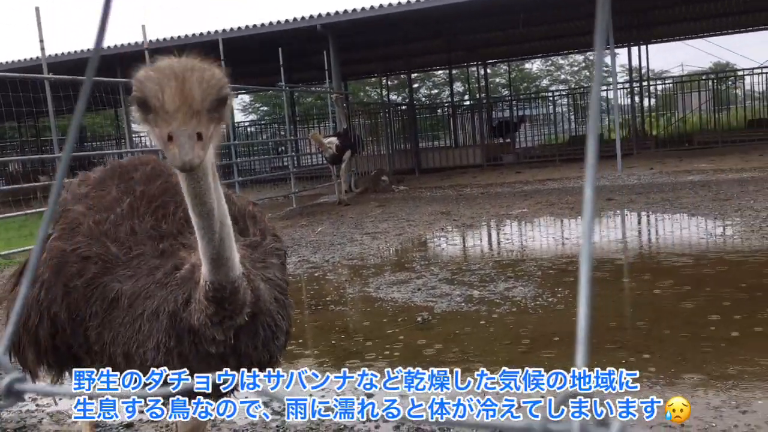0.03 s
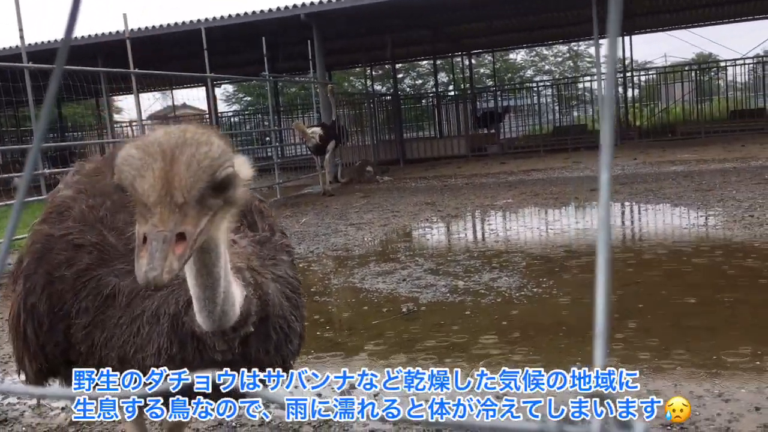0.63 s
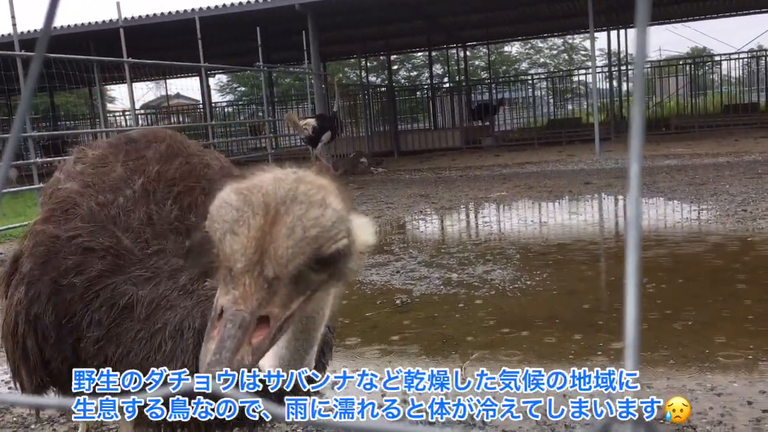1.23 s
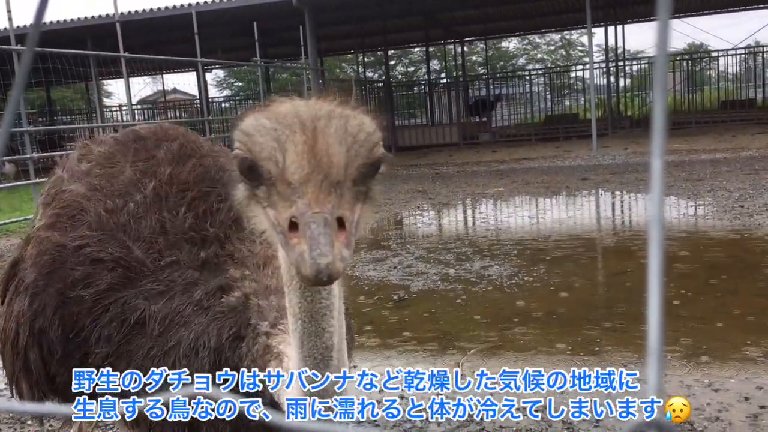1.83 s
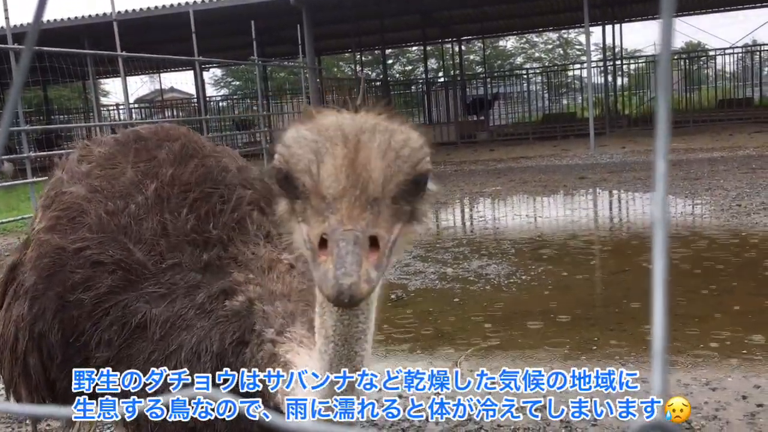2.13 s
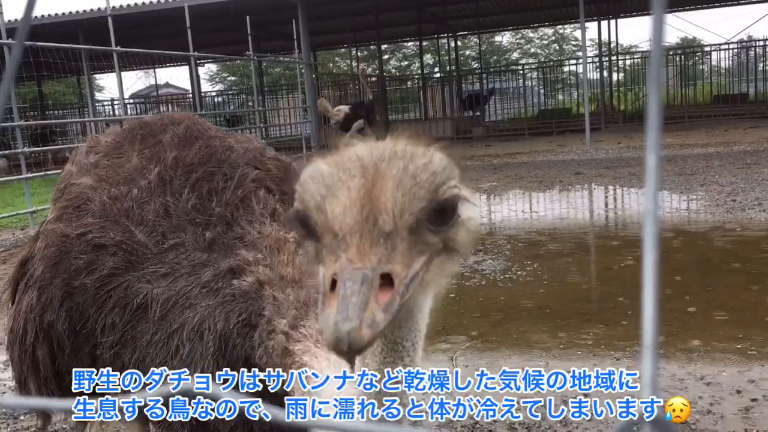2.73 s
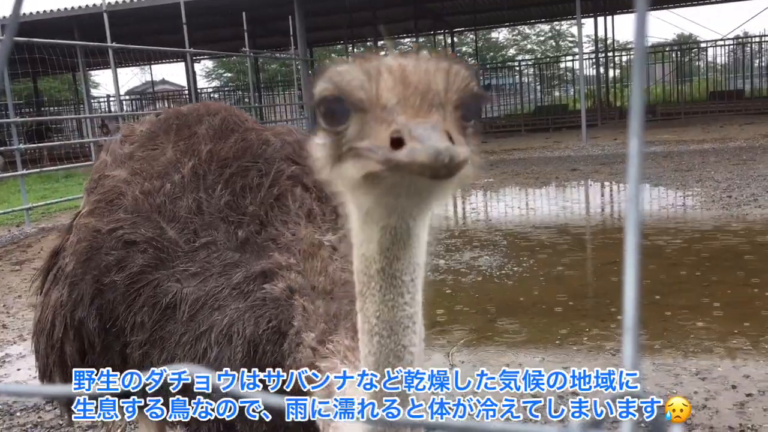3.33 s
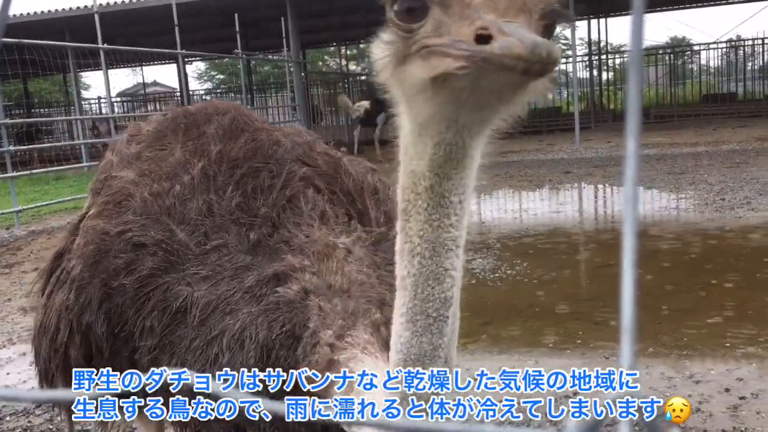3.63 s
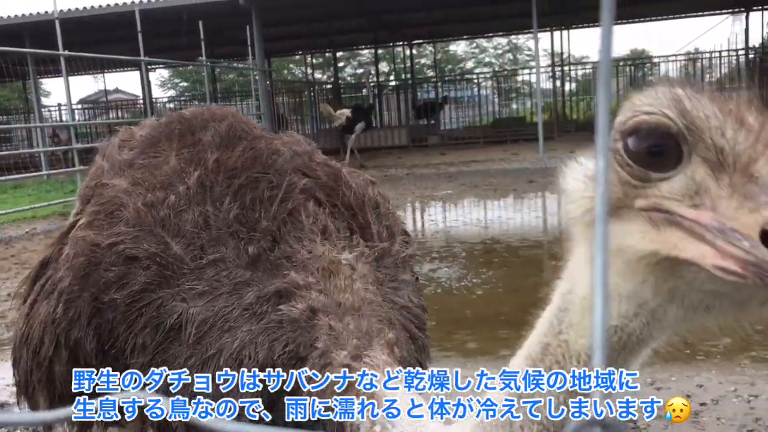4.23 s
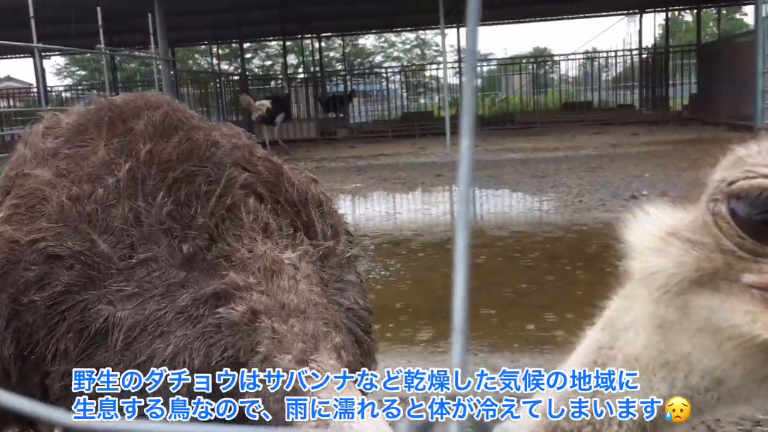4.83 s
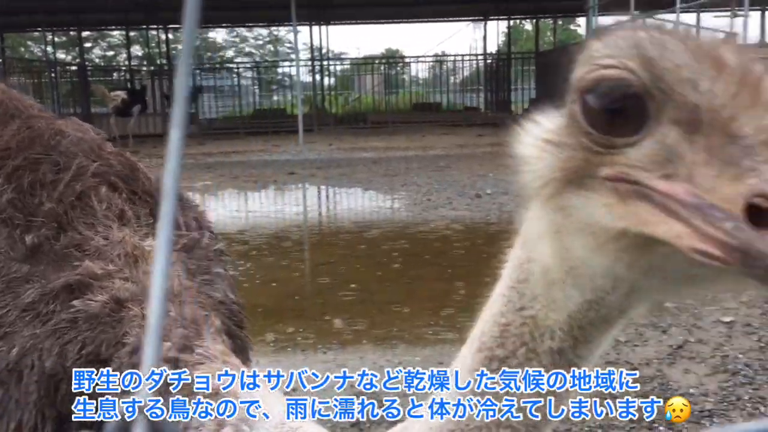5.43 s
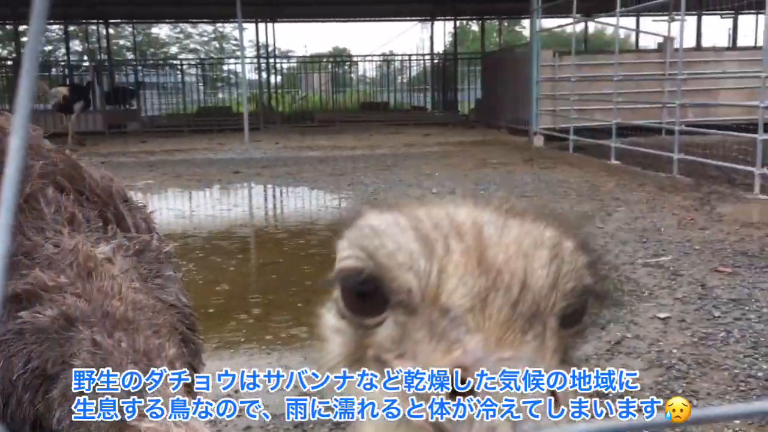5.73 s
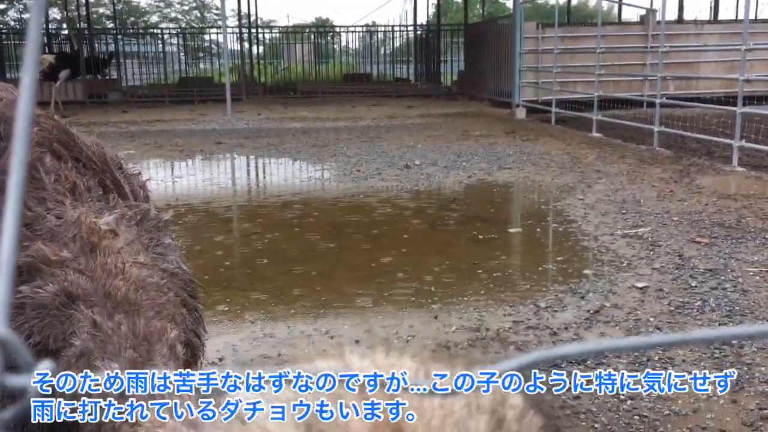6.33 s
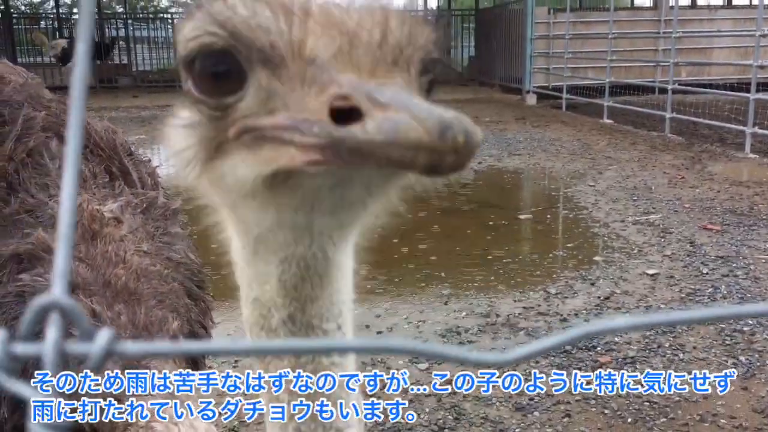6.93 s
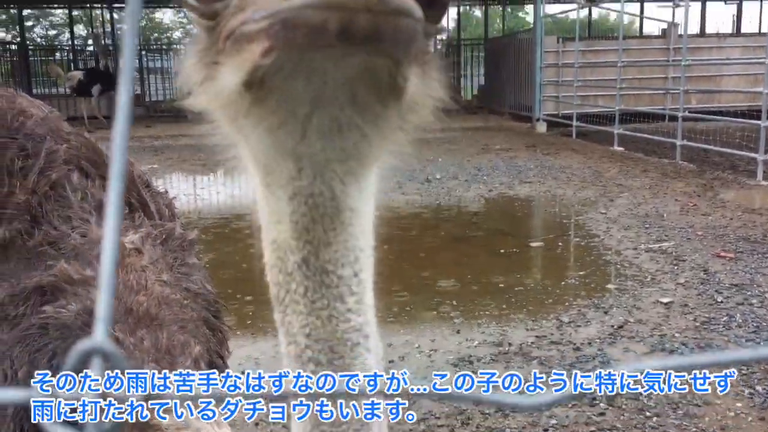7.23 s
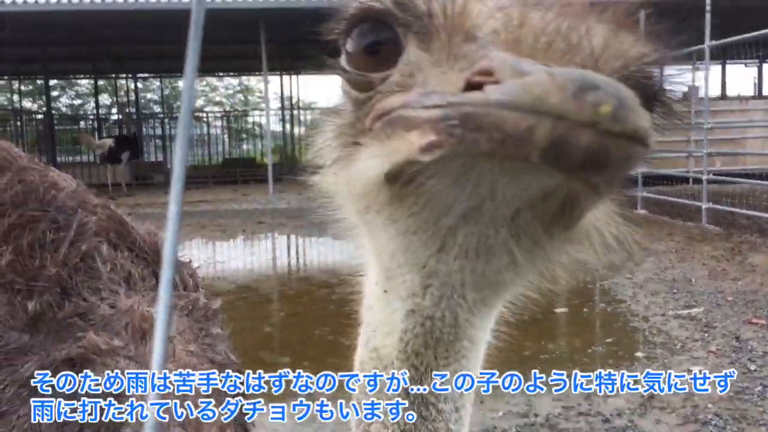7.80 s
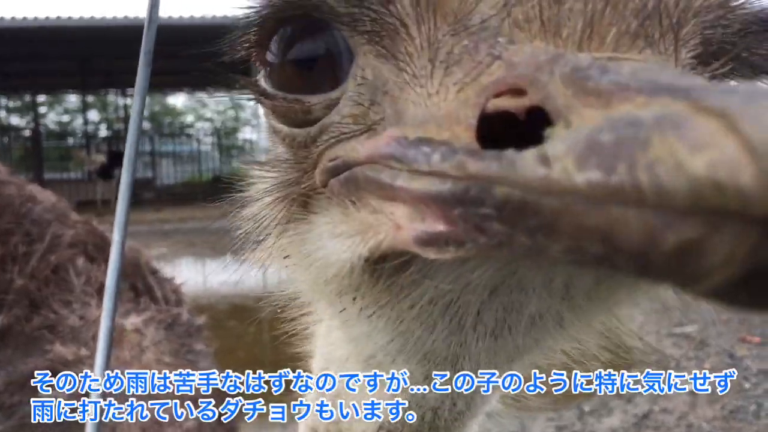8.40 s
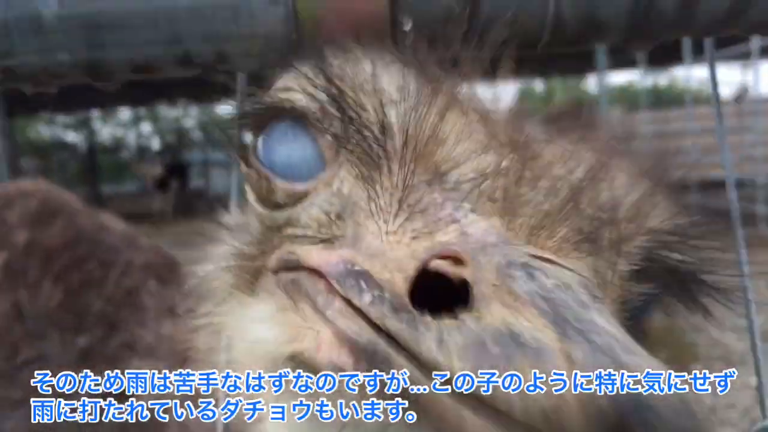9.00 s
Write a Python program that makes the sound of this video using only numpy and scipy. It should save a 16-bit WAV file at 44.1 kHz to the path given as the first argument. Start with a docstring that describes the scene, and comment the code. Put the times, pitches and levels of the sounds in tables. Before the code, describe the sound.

A cricket's high buzz repeats in light rain as a beak clicks and scrapes in grit, ending with a loud, close knock.

```python
"""An ostrich forages at the fence of a wet pen; drizzle and a low outdoor rumble run throughout.
At 0.3 s its beak clicks, knocks dully and scrapes in the gravel, again at 2.5 s and 5.4 s.
From 0.85 s a cricket buzzes its wings about once a second; from 1.3 s small birds call far off.
Near 8.9 s the beak knocks hard on a camera: the casing rings, the mount thumps, a fence wire pings."""
import sys
import numpy as np
from scipy import signal
from scipy.fft import rfft, irfft, next_fast_len
from scipy.io import wavfile

SR = 44100
rng = np.random.default_rng(int(sys.argv[2]) if len(sys.argv) > 2 else 0)


def digitize_waveform(pressure):
    """Quantize a signal to 16-bit integers and store it at the path in sys.argv[1].

    Rows of a 2-D input are taken as channels; values are limited to [-1, 1].
    """
    field = np.atleast_2d(pressure).T
    bounded = np.clip(field, -1, 1)
    quanta = np.round(bounded * 32767).astype(np.int16)
    wavfile.write(sys.argv[1], SR, quanta)


N = 399546

# beak and pebble clicks: start_s, attack_db, low_edge_hz
BEAK_CLICKS = [(.132, -50.5, 2500), (.290, -35, 4500), (.296, -24, 1100), (.3076, -31.5, 700),
               (.3232, -33.5, 400), (.3307, -33.5, 500), (.3352, -29, 700), (.3411, -26.5, 4500),
               (.369, -36, 400), (.459, -43.5, 9100), (.8655, -38, 6000), (.920, -47, 900),
               (2.142, -42, 700), (2.151, -33.5, 1200), (2.349, -47, 4420), (2.4743, -37, 3500),
               (2.477, -33.5, 3000), (2.5194, -28, 3000), (2.602, -35.5, 2200), (2.629, -41, 400),
               (2.6752, -39, 5060), (3.742, -50, 600), (5.3725, -38, 500), (5.4709, -32, 1400),
               (5.4771, -33.5, 1600), (5.5224, -33, 1500), (5.603, -39, 900), (5.7032, -41, 3000),
               (8.893, -41, 2000), (8.946, -44.5, 2500)]
# click spectrum: freq_hz, gain_db
CLICK_SPECTRUM = [(300, -7), (900, -9), (2000, -3), (3200, -0.5), (4400, -1.5), (5000, -3), (6500, 3),
                  (9000, 1.5), (10400, -1), (11400, -2.5), (15500, -6)]
# beak dragged through grit: start_s, length_s, level_db, ring_hz
BEAK_SCRAPES = [(.3, .059, -39.5, 8500), (.351, .045, -38.5, 4400), (2.478, .072, -40.5, 7000),
                (2.506, .029, -32.5, 6800), (5.37, .05, -47, 8000), (5.412, .086, -41.5, 12000)]
# grit spectrum: freq_hz, gain_db
GRIT_SPECTRUM = [(300, -13), (900, -1), (2000, -5), (3000, -1.5), (4400, -0.5), (5000, 1), (6500, 3.5),
                 (9000, 1.5), (10400, -1), (11400, 3.5), (15500, -4.5)]
# dull low knocks of the pecking beak: start_s, relative_peak_db
PECK_KNOCKS = [(0.288, -39), (0.916, -51), (2.141, -40), (2.342, -42), (2.628, -46), (3.286, -43),
               (3.739, -51), (5.371, -39), (5.6, -42), (7.11, -37), (8.064, -41), (8.305, -40)]
# peck knock spectrum: freq_hz, gain_db
PECK_KNOCK_SPECTRUM = [(120, -14), (320, -1.5), (550, -5), (1000, 5), (1600, -1.5), (3500, -7), (5000, -19),
                       (8000, -24)]
# beak blows on the casing: start_s, peak_db, cutoff_hz
CASING_BLOWS = [(8.857, -25, 500), (8.8608, -13, 14000), (8.8617, -15, 4500), (8.869, -12, 7000),
                (8.875, -16, 6000), (8.895, -26, 200), (8.913, -16.5, 600)]
# casing modes: freq_hz, gain_db, t60_s
CASING_MODES = [(215, -11.5, 0.077), (528, -6.5, 0.033), (636, -8.5, .03), (900, -6.5, 0.021),
                (1270, 2, 0.012), (1530, 3, 0.016), (2000, -5, 0.01), (2480, 2, 0.012), (2710, -4, 0.014),
                (3720, -16, 0.018), (5700, -13, 0.014)]
# swings of the mount: start_s, peak_db, first_hz, last_hz, swell_s
MOUNT_THUMPS = [(8.8592, -7.5, 175, 58, 0.0083), (8.858, -21, 230, 178, 0.0083),
                (8.8935, -16, 220, 150, 0.0019), (8.915, -35.5, 120, 54, 0.013)]
# feathers and feet: start_s, length_s, centre_hz, width_hz, level_db
BODY_SWISHES = [(1.85, 0.48, 830, 690, -59.5), (2.22, 0.47, 880, 1240, -53.5), (2.2, 0.41, 240, 210, -55),
                (2.615, 0.036, 2170, 2800, -51), (8.706, 0.064, 13600, 12000, -45.5),
                (8.81, 0.12, 4500, 11000, -51), (8.93, 0.14, 1420, 300, -53.5),
                (8.91, 0.15, 2800, 6000, -55)]
# cricket phrases: start_s, length_s, target_db
CRICKET_PHRASES = [(.85, .42, -42), (1.913, .448, -42.5), (2.951, .478, -42), (3.948, .48, -42.5),
                   (5.068, .447, -43.5), (6.015, .48, -42.5), (6.972, .446, -42), (7.962, .427, -42),
                   (8.985, .4, -42.5)]
# warbler notes (bend < 0 arches, > 0 dips): delay_s, length_s, turn_hz, turn_fraction, bend_hz
WARBLER_NOTES = [(0, .037, 2200, .9, -500), (.21, .06, 1990, .6, 1000), (.433, .029, 2220, .05, -750),
                 (.462, .031, 2010, .5, -1400), (.612, .038, 2280, .4, -2000),
                 (.768, .049, 2260, .47, -2300), (.934, .047, 1960, .25, -650)]
# warbler songs: start_s, level_db
WARBLER_SONGS = [(1.255, -54.7), (3.555, -50.5), (6.04, -58.5)]
# whistled peeps: start_s, length_s, pitch_hz, fall_hz, level_db
SPARROW_PEEPS = [(1.615, .028, 3430, 200, -57), (2.981, .028, 3300, 200, -51),
                 (3.556, .046, 4220, 1050, -54), (5.636, .03, 4100, 270, -53),
                 (5.665, .033, 3380, 100, -52), (6.913, .033, 3820, 400, -56)]
# raspy chirps: start_s, pitch_hz, level_db
SPARROW_CHIRPS = [(2.422, 4050, -59), (3.42, 3550, -62.5), (4.1, 4100, -57), (5.65, 4000, -61),
                  (7.39, 3930, -59.5), (8.405, 6270, -62)]
# open-air rumble spectrum: freq_hz, gain_db
RUMBLE_SPECTRUM = [(15, -36), (25, -12.5), (43, -6.5), (59, 0.5), (92, -8.5), (139, -7), (226, -9.5),
                   (409, -17.5), (466, -21), (963, -19.5), (1460, -21.5), (1780, -18), (2430, -23.5),
                   (4110, -28), (4800, -32.5), (6240, -48), (10600, -120)]
# hiss spectrum: freq_hz, gain_db
HISS_SPECTRUM = [(3500, -16), (5000, -2), (5700, 6), (7700, 1), (8800, 3), (9700, 2.5), (10450, -2),
                 (11500, 3), (13500, 3.5), (15700, -1.5)]


def pecks(pebble_gap_s=.025, pebble_db=-2.5):
    """The beak strikes and drags through gravel, flicking pebbles aside."""
    out = np.zeros(N)
    for start_s, db, edge_hz in BEAK_CLICKS:
        add(out, start_s, click(db, edge_hz))
    for start_s, length_s, db, ring_hz in BEAK_SCRAPES:
        add(out, start_s, scrape(length_s, db, ring_hz))
        for delay_s in rng.uniform(0, length_s, size=int(length_s / pebble_gap_s)):
            add(out, start_s + delay_s, click(db + pebble_db, edge_hz=1500))
    return echo(out, t60_s=.32, wet_db=-18)


def click(db, edge_hz, attack_s=.005, ring_db=-16):
    """A hard crack rings a pebble; smaller grit has a higher low edge and sounds thin."""
    t = span(.067)
    crack = noise(t) * fade(t, t60_s=.0067)
    pebble = sum(band(noise(t), hz, width_hz=860) for hz in rng.uniform(3670, 12860, size=4))
    ring = amp(ring_db) * unit(pebble) * fade(t, t60_s=.032)
    hit = highpass(colour(crack + ring, CLICK_SPECTRUM), edge_hz)
    return hit / hit[t < attack_s].std() * amp(db)


def scrape(length_s, db, ring_hz, ring_db=-3):
    """Tiny grains crunch and ring the stones beneath."""
    t = span(length_s)
    grit = grains(len(t), rate_per_s=16000, spread_db=5.5)
    crunch = unit(colour(grit, GRIT_SPECTRUM))
    stones = amp(ring_db) * unit(band(grit, ring_hz, .8 * ring_hz))
    return unit(crunch + stones) * np.sqrt(arch(t)) * amp(db)


def peck_knocks(gain_db=1.3):
    """Dull low knocks of the pecking beak."""
    out, t = np.zeros(N), span(.1)
    for start_s, db in PECK_KNOCKS:
        burst = noise(t) * fade(t, t60_s=.03)
        add(out, start_s, peak(colour(burst, PECK_KNOCK_SPECTRUM), db + gain_db))
    return out


def casing_blows(crack_db=4.5, detune=.043):
    """The beak rattles on the casing; each blow hits a new spot and moves the modes differently."""
    out, t = np.zeros(N), span(.12)
    for start_s, db, cutoff_hz in CASING_BLOWS:
        ring = np.zeros(len(t))
        for hz, mode_db, t60_s in CASING_MODES:
            gain = rng.choice([-1, 1]) * amp(mode_db)
            ring += gain * np.sin(2 * np.pi * hz * rng.normal(1, detune) * t) * fade(t, t60_s)
        crack = amp(crack_db) * noise(t) * fade(t, t60_s=.0065)
        add(out, start_s, peak(lowpass(ring + crack, cutoff_hz), db))
    return echo(out, t60_s=.25, wet_db=-20)


def mount_thumps(settle_s=.0063):
    """The mount swings, its pitch sinking as the contact relaxes."""
    out, t = np.zeros(N), span(.12)
    for start_s, db, first_hz, last_hz, swell_s in MOUNT_THUMPS:
        hz = last_hz + (first_hz - last_hz) * np.exp(-t / settle_s)
        envelope = (t / swell_s * np.exp(-t / swell_s)) ** .98
        swing = -np.cos(2 * np.pi * np.cumsum(hz) / SR)
        add(out, start_s, peak(swing * envelope, db))
    return out


def wire_ping(pitch_hz=3230, level_db=-49):
    """The last click plucks a fence wire."""
    out, t = np.zeros(N), span(.12)
    ring = np.sin(2 * np.pi * pitch_hz * t) * fade(t, t60_s=.15)
    add(out, BEAK_CLICKS[-1][0], ring * amp(level_db))
    return out


def swishes():
    """Feathers and feet brush past: soft swells of fine grains."""
    out = np.zeros(N)
    for start_s, length_s, hz, width_hz, db in BODY_SWISHES:
        t = span(length_s)
        friction = grains(len(t), rate_per_s=9000, spread_db=3.5)
        add(out, start_s, unit(band(friction, hz, width_hz)) * arch(t) * amp(db))
    return out


def cricket(wing_hz=6875, fall_hz=960, stroke_s=.0047, return_s=.0028, return_db=-10):
    """Each wing stroke is a falling tone with a weaker return; a phrase grows louder and slower."""
    swell_db, swell_s = 12, .19
    strokes_per_s, slowing_per_s2 = 150, 36
    out, t = np.zeros(N), span(stroke_s)
    for start_s, length_s, target_db in CRICKET_PHRASES:
        age_s = 0
        for jitter, force, detune, slack in rng.standard_normal((80, 4)):
            if age_s > length_s:
                break
            db = target_db - swell_db * np.exp(-age_s / swell_s) + 1.1 * force
            hz = wing_hz + 25 * detune + fall_hz * (.5 - t / stroke_s)
            stroke = tone(hz) * arch(t) ** 2 * amp(db)
            onset_s = start_s + age_s - stroke_s / 2
            add(out, onset_s, stroke)
            add(out, onset_s + return_s * (1 + .04 * slack), stroke * amp(return_db))
            age_s += (1 + .0018 * jitter) / (strokes_per_s - slowing_per_s2 * age_s)
    return echo(out, t60_s=.072, wet_db=-14)


def warbler():
    """One song, sung three times; each quavering note bends round a turning point."""
    out = np.zeros(N)
    for start_s, db in WARBLER_SONGS:
        for delay_s, length_s, turn_hz, turn_fraction, bend_hz in WARBLER_NOTES:
            t = span(length_s)
            hz = turn_hz + bend_hz * (t / length_s - turn_fraction) ** 2
            add(out, start_s + delay_s, tone(hz * quaver(t, cutoff_hz=350)) * arch(t) * amp(db))
    return out


def sparrows(rasp_hz=420, chirp_s=.068, fall_fraction=.18, flock_db=-69):
    """Falling calls: whistled peeps, longer raspy chirps, a faint flock behind."""
    out = np.zeros(N)
    for start_s, length_s, hz, fall_hz, db in SPARROW_PEEPS:
        t = span(length_s)
        peep = tone(hz * quaver(t, rasp_hz) + fall_hz * (.5 - t / length_s))
        add(out, start_s, peep * arch(t) * amp(db))
    t = span(chirp_s)
    flock = [(s, hz, flock_db) for s, hz in rng.uniform([0, 3000], [(N - 1) / SR, 4500], size=(40, 2))]
    for start_s, hz, db in list(SPARROW_CHIRPS) + flock:
        rasp = lowpass(lowpass(noise(t), rasp_hz), rasp_hz)
        chirp = tone(hz * (1 + fall_fraction * (.5 - t / chirp_s)))
        add(out, start_s, unit(chirp * rasp) * arch(t) * amp(db))
    return out


def rain(drizzle_db=-68, drip_db=-72):
    """Drizzle on a puddle and nearer ticking drips; each drop size has its own register."""
    drizzle = sum(band(grains(N, rate_per_s=90, spread_db=2), hz, hz / 4) / hz
                  for hz in (1200, 1850, 3300))
    splashes = sum(band(grains(N, rate_per_s=7, spread_db=2.2), hz, 1.3 * hz) / np.sqrt(hz)
                   for hz in (2600, 5500, 10500))
    drips = echo(splashes, t60_s=.014, wet_db=6)
    return unit(drizzle) * amp(drizzle_db) + unit(drips) * amp(drip_db)


def open_air(rumble_db=-54.2, drone_db=-61, hiss_db=-64.6):
    """Distant rumble, a low drone and a fine hiss."""
    rumble = unit(colour(rng.standard_normal(N), RUMBLE_SPECTRUM))
    drone = unit(band(rng.standard_normal(N), hz=61, width_hz=24))
    hiss = unit(colour(rng.standard_normal(N), HISS_SPECTRUM))
    return rumble * amp(rumble_db) + drone * amp(drone_db) + hiss * amp(hiss_db)


def echo(x, t60_s, wet_db):
    """Add scattered reflections from ground, fence and roof."""
    t = span(.6)
    tail = noise(t) * fade(t, t60_s)
    return x + amp(wet_db) * signal.fftconvolve(x, tail / np.linalg.norm(tail))[:N]


def grains(count, rate_per_s, spread_db):
    """Random impacts: many small, a few large."""
    size = amp(spread_db * np.minimum(rng.exponential(size=count), np.pi))
    return (rng.random(count) < rate_per_s / SR) * size * rng.standard_normal(count)


def quaver(t, cutoff_hz, depth=.016):
    """Random pitch factor around 1."""
    return 1 + depth * unit(lowpass(noise(t), cutoff_hz))


def colour(x, spectrum):
    """Minimum-phase filter through (freq_hz, gain_db) points."""
    n = next_fast_len(len(x) + 8192)
    hz, db = np.transpose(spectrum)
    bin_hz = np.arange(n // 2 + 1) * SR / n
    log_gain = np.interp(np.log(bin_hz + 1), np.log(hz), np.log(amp(db)))
    cepstrum = irfft(log_gain, n)
    cepstrum[1:n // 2] *= 2
    cepstrum[n // 2 + 1:] = 0
    return irfft(rfft(x, n) * np.exp(rfft(cepstrum)), n)[:len(x)]


def band(x, hz, width_hz):
    """A resonance, applied twice for steep sides."""
    b, a = signal.iirpeak(hz, hz / min(width_hz, SR / np.pi), fs=SR)
    return signal.lfilter(b, a, signal.lfilter(b, a, x))


def lowpass(x, hz):
    return signal.lfilter(*signal.butter(1, hz, fs=SR), x)


def highpass(x, hz):
    return signal.sosfilt(signal.butter(2, hz, "high", fs=SR, output="sos"), x)


def tone(hz):
    return np.sin(2 * np.pi * np.cumsum(hz) / SR)


def noise(t):
    return rng.standard_normal(len(t))


def amp(db):
    return 10 ** (np.asarray(db) / 20)


def unit(x):
    """Scale to rms 1."""
    return x / np.sqrt(np.mean(x ** 2))


def peak(x, db):
    """Scale to a peak level."""
    return x * amp(db) / np.abs(x).max()


def span(length_s):
    """Time axis."""
    return np.arange(int(length_s * SR)) / SR


def fade(t, t60_s):
    return np.exp(-np.log(1000) * t / t60_s)


def arch(t):
    """Half-sine envelope."""
    return np.sin(np.pi * np.arange(len(t)) / len(t))


def add(out, start_s, x):
    """Mix x in at start_s."""
    i = int(start_s * SR)
    out[i:i + len(x)] += x[:max(N - i, 0)]


def scene():
    """Cricket, ostrich, far birds and weather in mono."""
    buzz = cricket()
    ostrich = pecks() + peck_knocks() + casing_blows() + mount_thumps() + wire_ping()
    birds = echo(warbler() + sparrows(), t60_s=.45, wet_db=-7.5)
    return (buzz + ostrich + swishes() + birds + open_air() + rain())[None]


def record(dry, low_hz=30, top_hz=15800):
    """Cut the deepest bass and the top."""
    return signal.sosfilt(signal.ellip(10, .2, 70, top_hz, fs=SR, output="sos"), highpass(dry, low_hz))


dry = scene()
out = record(dry)
digitize_waveform(out)
```